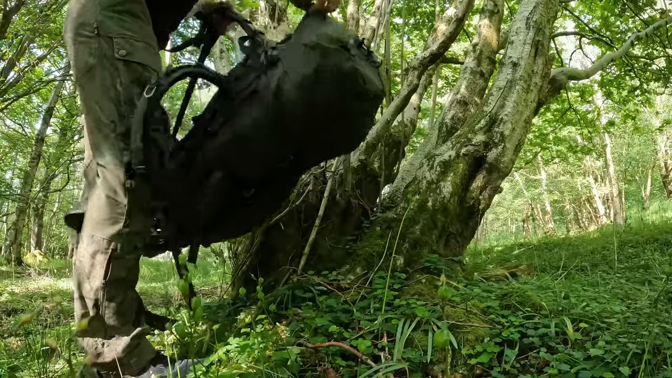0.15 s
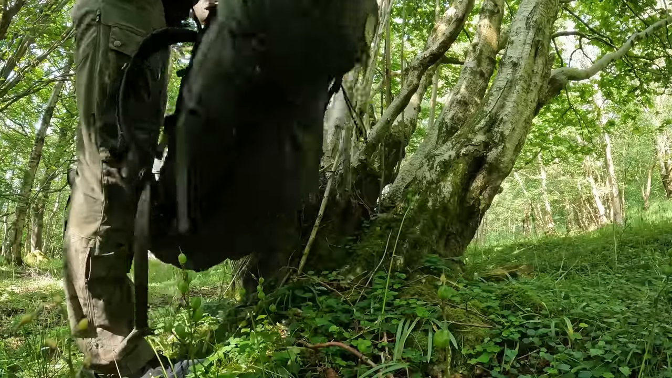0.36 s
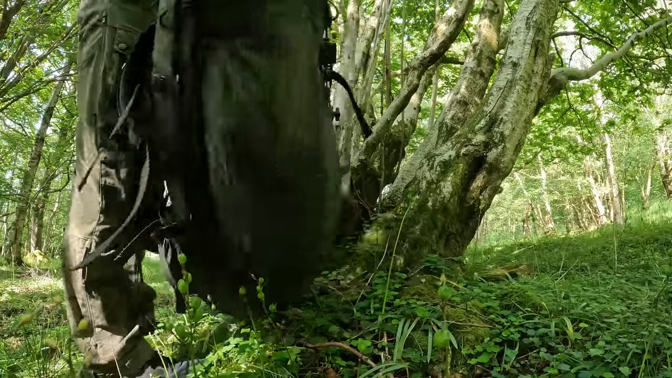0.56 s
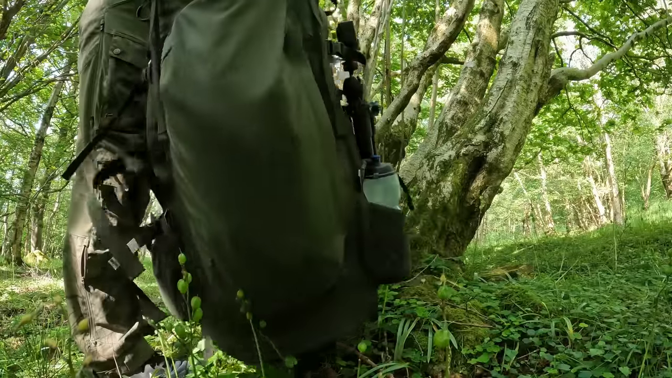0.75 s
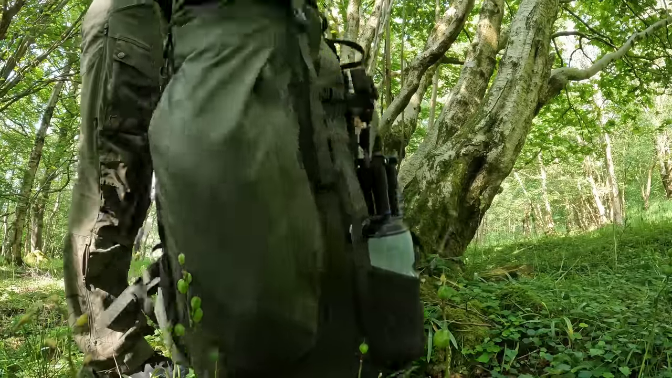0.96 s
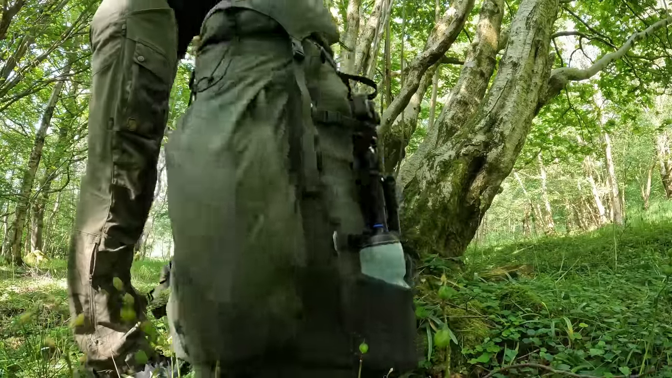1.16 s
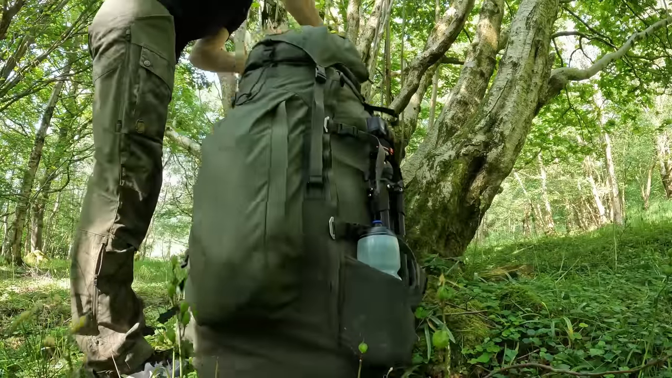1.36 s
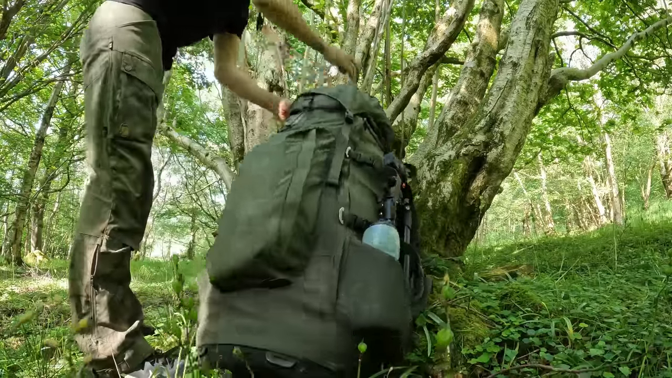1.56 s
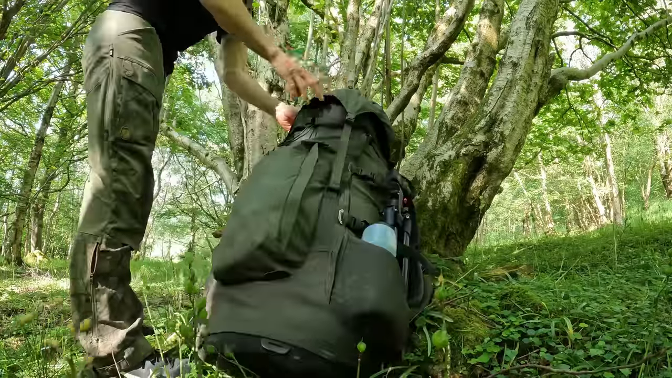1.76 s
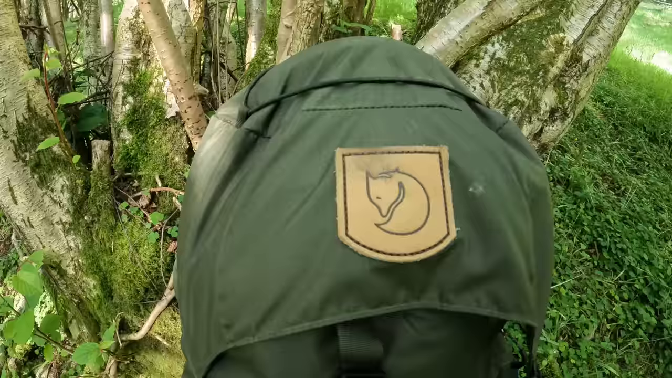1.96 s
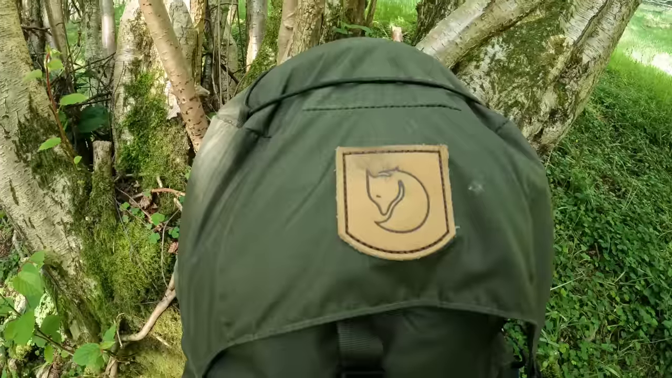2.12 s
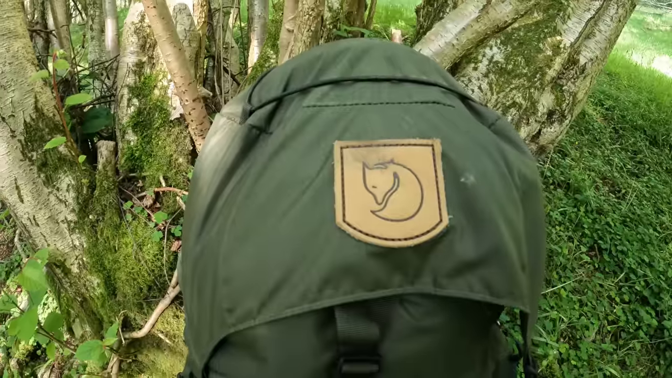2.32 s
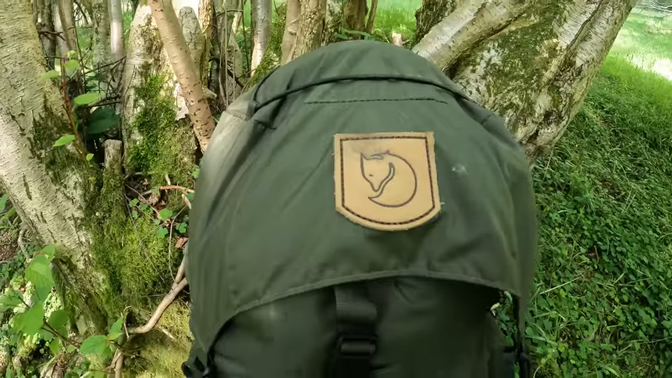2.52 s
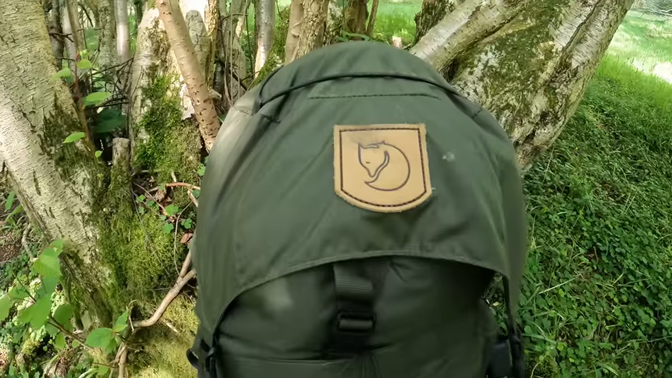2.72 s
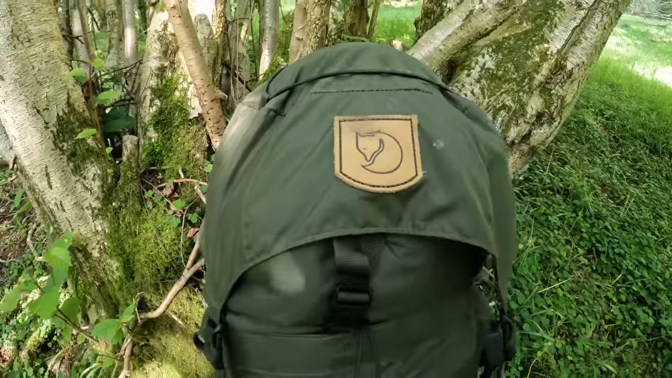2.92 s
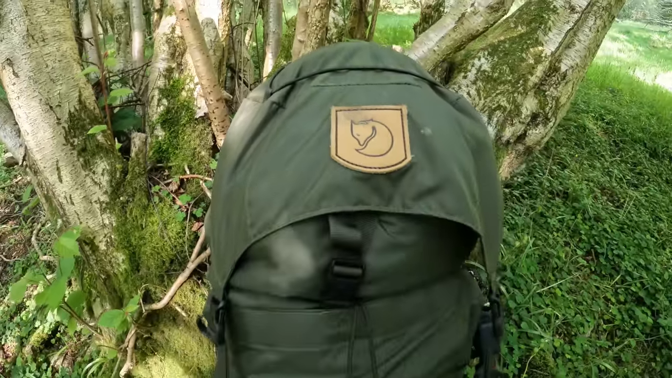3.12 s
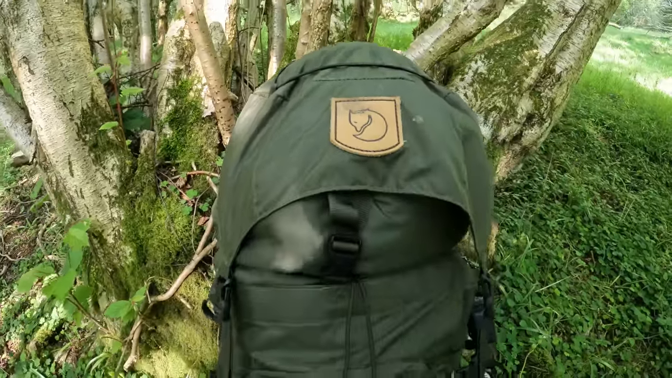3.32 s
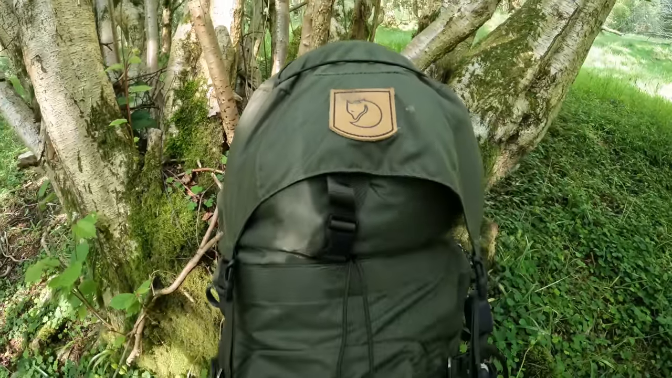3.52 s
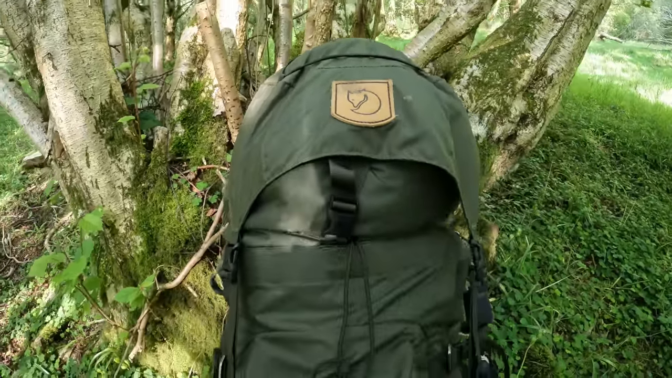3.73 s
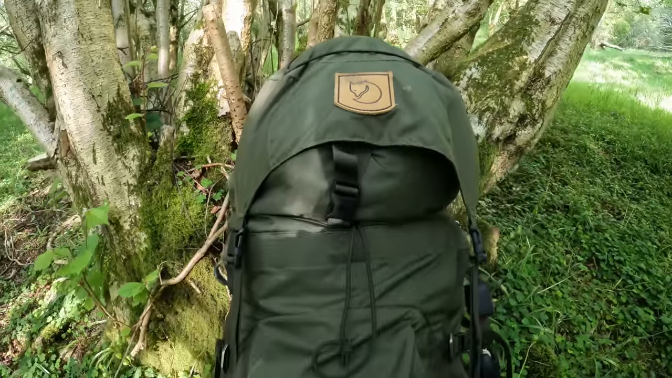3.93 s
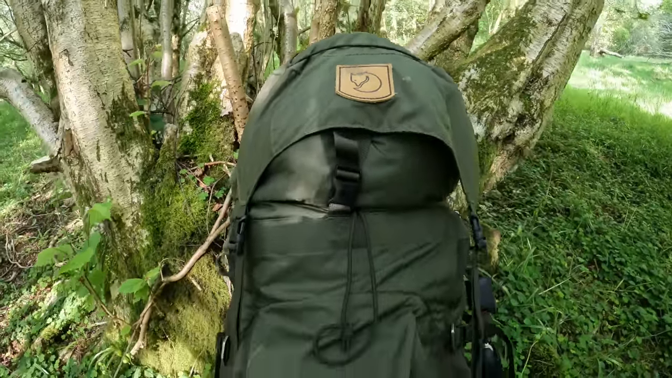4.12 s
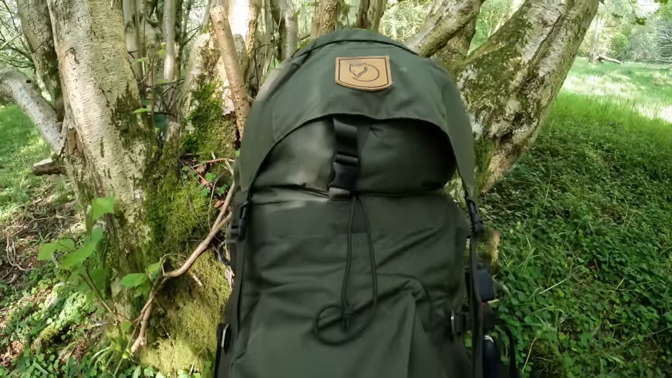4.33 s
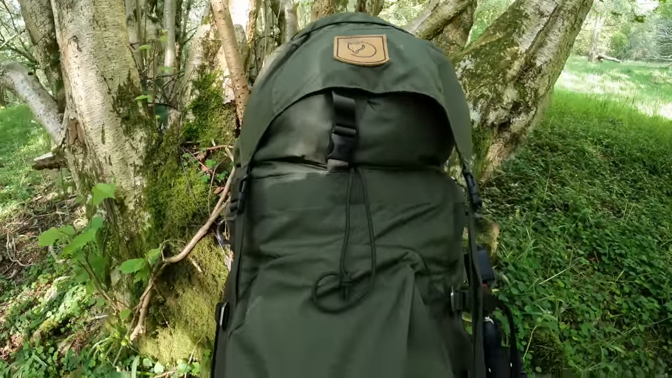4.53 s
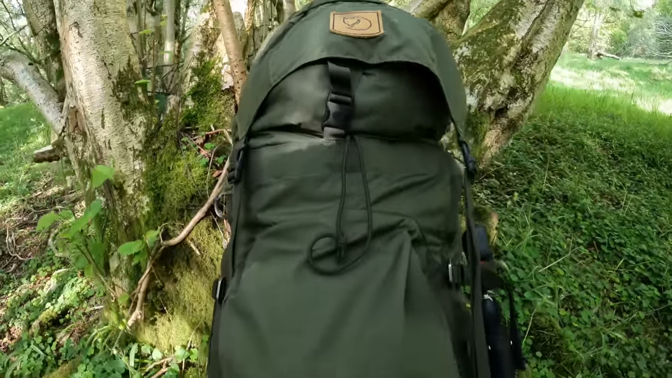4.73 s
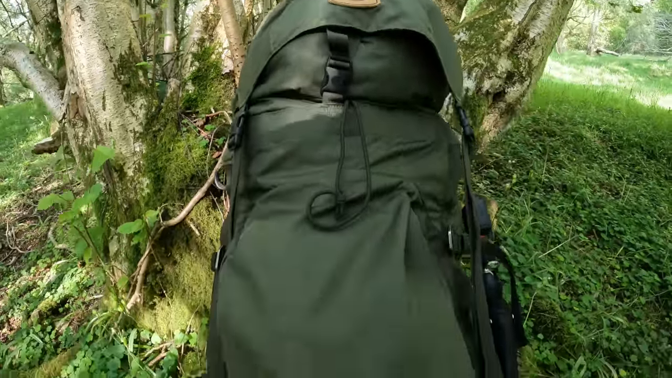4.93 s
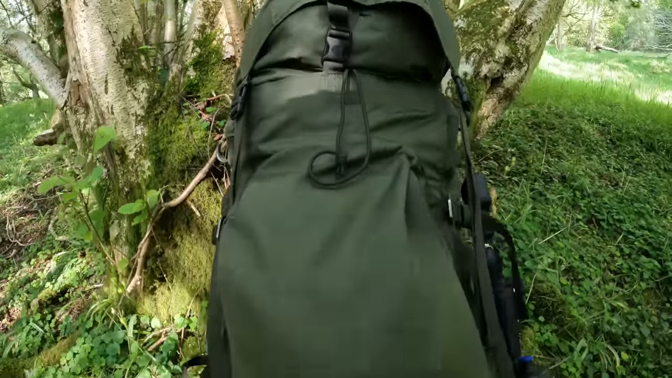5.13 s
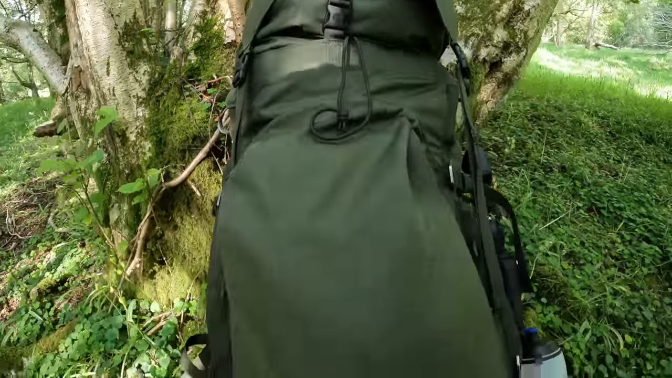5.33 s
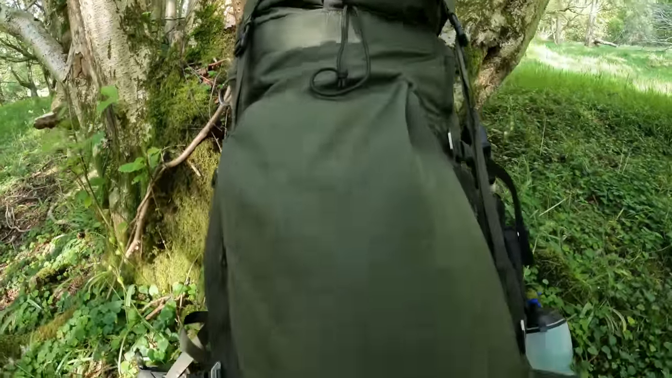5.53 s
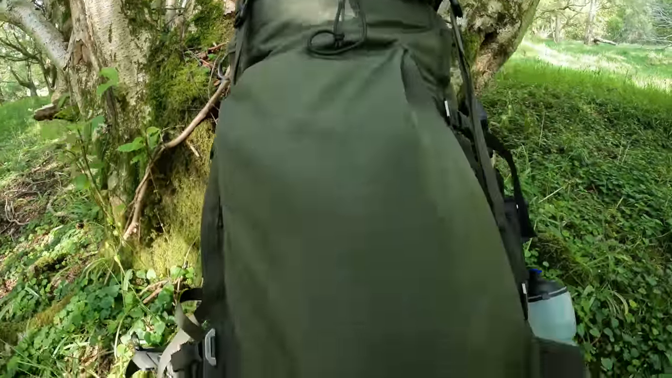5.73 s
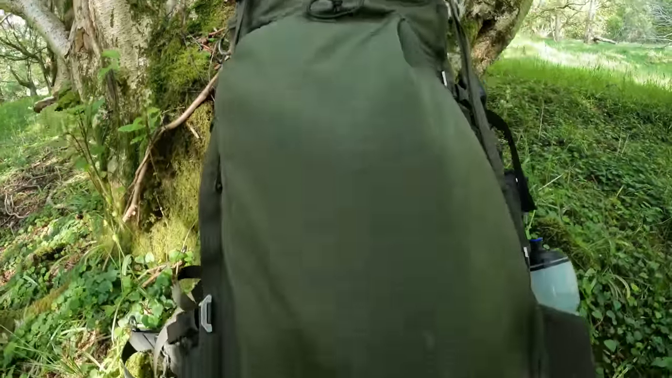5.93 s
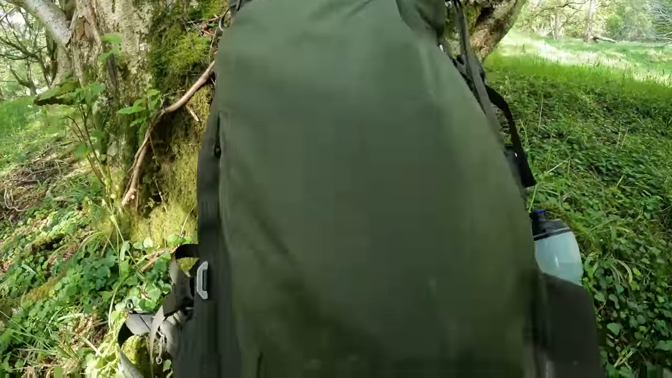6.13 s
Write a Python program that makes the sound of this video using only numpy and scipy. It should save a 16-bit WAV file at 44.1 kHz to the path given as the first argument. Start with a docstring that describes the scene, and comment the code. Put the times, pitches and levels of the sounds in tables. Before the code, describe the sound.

Cloth rustle, snapping twigs and a loud hard knock as a pack lands, cutting abruptly to hushed woods, far birds and plastic grip clicks.

```python
"""A heavy rucksack swings and drops into undergrowth: straps rub, cloth and leaves rustle as filtered grains
of noise, twigs snap as resonant bursts, the load thuds as decaying sines and a buckle clacks on a bottle.
After a hard cut at about 2 s a hand-held camera's grip ticks and creaks as struck modes, its body rumbles
and hums, and far birds sing as echoed gliding tones. The hush of the wood, shaped noise, lies under it all."""
import sys
import numpy as np
from scipy import signal
from scipy.fft import rfft, irfft, next_fast_len
from scipy.io import wavfile
from scipy.ndimage import uniform_filter1d

SR = 44100
rng = np.random.default_rng(int(sys.argv[2]) if len(sys.argv) > 2 else 0)


def wrap_up_sound(samples):
    """Save the sound to the file named by the first command line argument, as 16-bit audio."""
    columns = np.atleast_2d(samples).T
    # keep every value between -1 and 1, then stretch to whole-number steps
    tamed = np.clip(columns, -1, 1)
    steps = np.round(tamed * 32767).astype(np.int16)
    wavfile.write(sys.argv[1], SR, steps)


N = 276507
CUT_S = 1.993  # the close scene of the pack ends here


def amp(db):
    """Decibel law: level to amplitude ratio."""
    return 10 ** (np.asarray(db) / 20)


def evened(x):
    """Power normalisation: scales a signal to rms 1."""
    return x / np.sqrt(np.mean(x ** 2) + 1e-20)


def smooth_noise(count, size):
    """Moving average: slow random fluctuation of rms 1."""
    return evened(uniform_filter1d(rng.standard_normal(count), size))


def coloured(x, points):
    """Spectral shaping: filters by a curve drawn on a log-frequency axis; rms 1."""
    size = next_fast_len(len(x))
    hz, db = np.transpose(points)
    bins_hz = np.fft.rfftfreq(size, 1 / SR)
    gain = amp(np.interp(np.log(bins_hz + 1), np.log(hz), db, left=-80, right=-80))
    return evened(irfft(rfft(x, size) * gain, size)[:len(x)])


def columns(rows):
    """Linear interpolation: joins curve rows by straight lines, one value a sample."""
    s, *values = np.transpose(rows)
    return [np.interp(np.arange(N) / SR, s, v) for v in values]


def add(mix, s, sound):
    """Superposition: adds a sound to the mix from time s, cut at the end."""
    part = mix[round(s * SR):][:len(sound)]
    part += sound[:len(part)]


def ring(hz, t60, size=3000):
    """Damped oscillation: a sine that dies by 60 dB in t60 seconds, 2 ms at least."""
    t = np.arange(size) / SR
    return amp(-60 * t / max(t60, .002)) * np.sin(2 * np.pi * hz * t)


def band(x, hz, sharpness):
    """Resonance: a two-pole peak whose sharpness is its frequency over its width."""
    return signal.lfilter(*signal.iirpeak(hz, sharpness, SR), x)


def grains(per_s, spread_db, t60):
    """Shot noise: the level jumps with each small contact and dies away; a few contacts are large."""
    sizes = amp(spread_db * np.minimum(rng.exponential(1, N), 4))
    jumps = sizes * (rng.random(N) < per_s / SR)
    level = signal.lfilter([1], [1, -amp(-60 / (t60 * SR))], jumps)
    return level * rng.standard_normal(N)


def patchy(x, depth_db, size):
    """Random modulation: patches of time and frequency swell and fade; rms about 1."""
    z = signal.stft(x, nperseg=256)[2]
    over_hz = uniform_filter1d(rng.standard_normal(z.shape), size, 0)
    patches = evened(uniform_filter1d(over_hz, size, 1))
    return evened(signal.istft(z * amp(depth_db * patches), nperseg=256)[1][:N])


def arch(start, length, first_hz, last_hz, db, edge_db):
    """Linear glide: pitch curve rows, with the level shifted by edge_db at both ends."""
    return [(start, first_hz, db + edge_db),
            (start + length / 2, (first_hz + last_hz) / 2, db),
            (start + length, last_hz, db + edge_db)]


def glide(rows, blur):
    """Frequency modulation: a tone along a curve, its pitch shaken by the share blur."""
    s, hz, db = np.transpose(rows)
    t = np.arange(s[0], s[-1], 1 / SR)
    shaken_hz = np.interp(t, s, hz) * (1 + blur * smooth_noise(len(t), 60))
    tone = np.sin(2 * np.pi * np.cumsum(shaken_hz) / SR)
    level = np.sqrt(2) * amp(np.interp(t, s, db))  # the dB of a curve are rms
    return s[0], level * tone * signal.windows.tukey(len(t), .3)


def strike(modes, bright_db, noise, scatter_db):
    """Modal excitation: a brief contact rings an object to peak 1, and small parts rattle with it."""
    body = np.zeros(len(noise))
    for k, (hz, db, t60) in enumerate(modes):
        mode_db = db + bright_db * np.log2(hz / 3000)  # tilt in dB per octave
        body += (-1) ** k * amp(mode_db) * ring(hz, t60, size=len(noise))
    contact = .16 * noise[:70] * np.hanning(70)
    contact[20] += 1.5  # one sharp slip among the small ones
    sound = np.convolve(contact, body)[:len(noise)]
    t = np.arange(len(noise)) / SR
    rattle = band(noise[::-1], 3500 * amp(bright_db / 2), 0.45)
    rattle *= np.minimum(t / 0.00081, 1) * amp(scatter_db - 60 * t / 0.018)
    return sound / abs(sound).max() + rattle


# spectrum of the hush: (frequency [Hz], relative density [dB per Hz])
HUSH_SPECTRUM = [(22, -15.5), (40, -8), (62, 2), (100, 0.5), (165, 2.5), (260, -2.5), (400, -8.5),
                 (600, -11), (900, -6.5), (1200, -9.5), (1700, -18.5), (3500, -17), (6500, -20),
                 (10000, -26), (16500, -34)]
HUSH_DB = -53.5  # rms


def hush():
    """Broadband ambient noise: far leaves, a distant road and the microphone's own hiss."""
    return amp(HUSH_DB) * patchy(coloured(rng.standard_normal(N), HUSH_SPECTRUM), 0.86, size=12)


# bird notes: (start [s], length [s], first pitch [Hz], last pitch [Hz], starting level [dB])
BIRD_NOTES = [(2.12, .04, 3500, 3000, -67), (2.13, .09, 7030, 6390, -65), (2.294, 0.079, 6800, 5900, -64.5),
              (2.239, .03, 3700, 4000, -67), (2.265, .03, 3976, 3600, -64), (2.388, .035, 3600, 3950, -65),
              (2.421, 0.054, 3970, 3210, -62), (2.57, 0.052, 3300, 3050, -60),
              (2.98, 0.12, 7640, 7200, -58.5), (2.974, .13, 6230, 5780, -56), (3.12, .28, 7460, 6820, -62),
              (3.17, .1, 5900, 5150, -57), (3.44, .02, 4650, 4600, -65), (4.703, .08, 7160, 7030, -65),
              (4.77, .03, 3900, 4700, -65), (4.86, 0.105, 7250, 6700, -66), (4.892, .08, 8700, 7800, -67),
              (4.927, 0.093, 4500, 4546, -63), (5.07, .03, 6300, 5500, -58.5), (5.17, .04, 6400, 5620, -57),
              (5.259, 0.066, 6140, 5397, -58.5), (5.28, 0.2, 4483, 4490, -62.5),
              (5.28, .05, 3410, 3000, -65.5), (5.41, .05, 5500, 4760, -64), (6.117, .12, 6170, 5412, -55.5),
              (6.117, .15, 7550, 7200, -57), (6.127, 0.13, 8500, 8050, -58)]
NOTE_FADE_DB_PER_S = -70
# one bird's steep falling chirp: (time from its start [s], pitch [Hz], mean level [dB])
FALLING_CHIRP = [(0, 5300, -76), (.022, 4340, -68), (.05, 3700, -71)]
CHIRP_START_S, CHIRP_EVERY_S = 5.515, .14
# blurred chatter: (start [s], length [s], first pitch [Hz], last pitch [Hz], mid level [dB])
FAR_CHATTER = [(2.45, .9, 3100, 3050, -72.5), (3.35, .7, 3250, 3400, -67.5), (3.3, .35, 5300, 5500, -70.5)]
WARBLE, SYLLABLE_S = .05, .04  # pitch wander as a share, drawn once a syllable


def birds():
    """Reverberation: fluttering near-sine notes are smeared by echoes among the trunks."""
    direct, chatter = np.zeros((2, N))
    for s, length, first_hz, last_hz, db in BIRD_NOTES:
        last_db = db + NOTE_FADE_DB_PER_S * length
        add(direct, *glide([(s, first_hz, db), (s + length, last_hz, last_db)], blur=.009))
    for s in np.arange(CHIRP_START_S, N / SR, CHIRP_EVERY_S):
        level_shift_db = 1.5 * rng.standard_normal()
        add(direct, *glide(np.add(FALLING_CHIRP, [s, 0, level_shift_db]), blur=.02))
    for row in FAR_CHATTER:
        s, hz, db = np.transpose(arch(*row, edge_db=-4.5))
        t = np.arange(s[0], s[-1], SYLLABLE_S)
        wandering_hz = np.interp(t, s, hz) * (1 + WARBLE * rng.standard_normal(len(t)))
        add(chatter, *glide(np.transpose([t, wandering_hz, np.interp(t, s, db)]), blur=0.0252))
    direct += chatter * amp(3.5 * smooth_noise(N, 1200))  # the level flickers like short syllables
    t = np.arange(SR // 2) / SR
    tail = rng.standard_normal(len(t)) * amp(-60 * t / 0.646)
    return direct + amp(-2.5) * signal.oaconvolve(direct, tail / np.linalg.norm(tail))[:N]


# two squeezes of the hand on the camera: (time [s], rumble level [dB], body hum level [dB])
HAND_SQUEEZES = [
    [(2.4, -68.5, -59.5), (2.9, -61.5, -58.5), (3.4, -67, -59), (3.62, -57, -53), (3.82, -53, -52),
     (3.95, -56, -53.5), (4.15, -50, -50), (4.31, -44, -44), (4.38, -44.5, -49.5), (4.45, -60, -47.5),
     (4.5, -55, -59), (4.58, -60, -71)],
    [(6, -55.5, -58), (6.02, -42, -40.5), (6.05, -47.5, -55), (6.2, -83, -75)],
]
# spectrum of the rumble: (frequency [Hz], relative density [dB per Hz])
RUMBLE_SPECTRUM = [(25, -23), (45, -15), (65, 9.5), (110, -3.5), (170, -22)]
# spectrum of the body hum: (frequency [Hz], relative density [dB per Hz])
HUM_SPECTRUM = [(90, -34), (150, -2.5), (250, -1), (350, -5), (550, -15.5), (900, -35)]


def hand():
    """Structure-borne sound: lumpy low noise from the hand, through the camera body."""
    rumble_db, hum_db = columns(sum(HAND_SQUEEZES, []))
    rumble = coloured(rng.standard_normal(N), RUMBLE_SPECTRUM)
    hum = coloured(grains(250, 3.0, 0.078), HUM_SPECTRUM)
    t = np.arange(N) / SR
    holding = np.zeros(N)
    for rows in HAND_SQUEEZES:
        to_nearer_end_s = np.minimum(t - rows[0][0], rows[-1][0] - t)
        holding += np.clip(to_nearer_end_s * 30, 0, 1)
    return (amp(rumble_db) * rumble + amp(hum_db) * hum) * holding


# grip ticks: (time [s], tick level [dB], knock relative to it [dB], brightness [dB per octave])
GRIP_TICKS = [(2.0388, -44, -12, 9.5), (2.3469, -40, -4, -5), (2.59, -43, 0.5, 11),
              (2.6497, -39, -11.5, -8), (2.678, -39.5, -6, -2), (2.739, -42, -7, -1),
              (2.772, -28, -6.5, -4.5), (2.8438, -32.5, -6.5, -6), (3.1432, -34.5, -7, -3.5),
              (3.2, -32.5, -2.5, -2), (3.2447, -34, -3, -4), (3.2916, -35, -2.5, -3),
              (3.3303, -36.5, -2, -7), (3.3857, -37.5, 0.5, -3), (3.5191, -40.5, -4, -4),
              (3.5598, -41, -3, -9.5), (3.594, -35, -1, -2), (3.634, -38, -10, -4), (3.666, -38.5, -7, 1),
              (3.7487, -39.5, -14, 2), (3.8147, -44.5, 10.5, -2), (4.308, -39, -1, -4),
              (4.4154, -40, -11, -2), (4.6, -36, -20, 18), (4.808, -49, 8.5, 2), (4.98, -50, 7.5, 0),
              (5.1807, -46, 7, 0), (5.671, -41.5, -15.5, 8), (5.9616, -41, -20, 17),
              (6.0137, -18, -14, 0.5), (6.0775, -41, -10, 9), (6.0975, -40.5, -18, 10)]
# modes of the plastic grip: (frequency [Hz], relative level [dB], decay by 60 dB [s])
GRIP_MODES = [(1390, -5, 0.0058), (3060, 1, 0.01), (3900, 1.5, 0.0027), (5450, -2, 0.0076),
              (7100, -1.5, 0.0064), (8600, -11.5, .005), (11300, -30, 0.00248)]
# knock of the camera body: (frequency [Hz], decay by 60 dB [s], delay after the tick [s])
BODY_KNOCK = (260, 0.045, 0.00454)
# faint ticks scattered between: (mean rate [per s], level [dB], brightness [dB per octave])
FAINT_GRIP_TICKS = (2.5, -42, 8)


def grip_ticks():
    """Impact excitation: single ticks ring the plastic grip; the camera body knocks just after."""
    out = np.zeros(N)
    hz, knock_t60, delay = BODY_KNOCK
    for s, db, knock_db, bright_db in GRIP_TICKS:
        noise = rng.standard_normal(900)
        add(out, s, amp(db) * strike(GRIP_MODES, bright_db, noise, scatter_db=-14.0))
        add(out, s + delay, amp(db + knock_db) * ring(hz * (1 + 0.043 * noise[0]), knock_t60))
    per_s, db, bright_db = FAINT_GRIP_TICKS
    chosen = rng.random(N - round(CUT_S * SR)) < per_s / SR
    for s in CUT_S + np.flatnonzero(chosen) / SR:
        tick = strike(GRIP_MODES, bright_db, rng.standard_normal(900), scatter_db=-14.5)
        add(out, s, amp(db) * tick)
    return out


# quick slips of the grip: (time [s], reference level [dB], slip rate [per s])
GRIP_CREAK = [(3.35, -63.5, 30), (4.1, -67.5, 62), (4.24, -61.5, 79), (4.27, -57.5, 80), (4.37, -58, 81),
              (4.39, -58, 420), (4.445, -59, 400), (4.47, -64, 93)]


def creak():
    """Stick-slip friction: a run of quick slips rings the grip while skin slides between them."""
    out = np.zeros(N)
    creak_db, per_s = columns(GRIP_CREAK)
    unsteady = abs(1 + .15 * smooth_noise(N, 500))
    at_sample = np.arange(N)
    active = (at_sample > GRIP_CREAK[0][0] * SR) & (at_sample < GRIP_CREAK[-1][0] * SR)
    slip_count = np.floor(np.cumsum(per_s * unsteady) / SR)
    for at in np.flatnonzero(np.diff(slip_count, prepend=0) * active):
        noise = rng.standard_normal(900)
        slip_db = creak_db[at] + 16 + 2.5 * noise[0]
        add(out, at / SR, amp(slip_db) * strike(GRIP_MODES, -1.5, noise, scatter_db=-12))
    response = sum(amp(db) * ring(hz, t60 / 2) for hz, db, t60 in GRIP_MODES[1:5])
    rasp = signal.oaconvolve(rng.standard_normal(N), response)[:N]
    return out + amp(creak_db - 4) * active * evened(rasp)


# short rubs of strap on cloth: (start [s], length [s], first pitch [Hz], last pitch [Hz],
# mid level [dB], unsteadiness [share of pitch])
STRAP_RUBS = [(0.065, .02, 1503, 1508, -31.5, .2), (.092, 0.013, 1400, 1430, -22, 0.18),
              (0.713, 0.0291, 3300, 4600, -34.5, .05), (.842, 0.057, 601, 481, -31.5, 0.17),
              (0.883, 0.034, 330, 293, -30.5, 0.14), (0.913, 0.029, 592, 1287, -31.5, .15)]
RUB_EDGE_DB = -10  # ends of a rub under its middle


def rubs():
    """Stick-slip friction: webbing gives a rough, wandering tone."""
    out = np.zeros(N)
    for *row, blur in STRAP_RUBS:
        add(out, *glide(arch(*row, RUB_EDGE_DB), blur))
    return out * (1 + 0.42 * smooth_noise(N, 50))


# twigs and buckles: (time [s], peak level before the treble is softened [dB], centre [Hz])
TWIG_SNAPS = [(0.189, -23.5, 1890), (0.195, -26.5, 6000), (0.237, -28, 6380), (0.4183, -20.5, 3470),
              (0.4964, -21, 1980), (0.5435, -18, 4510), (0.713, -19.5, 3720), (0.745, -29, 5440),
              (0.785, -20.5, 6900), (0.812, -24, 7000), (0.847, -21.5, 2260), (0.953, -4.5, 6350),
              (0.96, -10, 6700), (0.993, -13, 850), (1.007, -18.5, 2120), (1.145, -28.5, 964),
              (0.954, -17, 900), (1.2045, -12.5, 5000), (1.252, -26, 826), (1.274, -20.5, 6150),
              (1.331, -18.5, 1490), (1.333, -14.5, 6950), (1.352, -17.5, 1130), (1.424, -23, 885),
              (1.442, -17.5, 5700), (1.522, -19, 8350), (1.557, -26, 1997), (1.563, -19, 5470),
              (1.567, -19.5, 7000), (1.622, -25, 1470), (1.967, -17.5, 9820), (1.982, -19, 5500)]
SNAP_T60, SNAP_SHARPNESS = 0.016, 2.25  # tail [s], ring as frequency over width


def snaps():
    """Impulsive release: a sudden crack with a short noisy tail, coloured by the piece that broke or struck."""
    out, t = np.zeros(N), np.arange(3000) / SR
    decay = amp(-60 * t / 0.0031) + 0.16 * amp(-60 * t / SNAP_T60)
    for s, db, hz in TWIG_SNAPS:
        burst = rng.standard_normal(3000) * np.minimum(t / 0.00051, 1) * decay
        piece = band(band(burst, hz, SNAP_SHARPNESS), hz, .5)
        sound = piece + .12 * band(burst, 3600, 0.3)
        add(out, s, amp(db) * sound / abs(sound).max())
    return signal.lfilter(*signal.butter(2, 11500, fs=SR), out)


# soft blows of the load: (time [s], level before decay [dB], frequency [Hz], decay by 60 dB [s])
LOAD_THUDS = [(0.497, -28, 384, 0.0345), (0.829, -26.5, 770, 0.024), (0.987, -20, 384, 0.094),
              (1.006, -17.5, 247, 0.037), (1.203, -29, 410.6, 0.048), (1.329, -33.5, 510, .037),
              (1.517, -24, 120.6, .036), (1.561, -21, 480, .04), (1.564, -18, 193, 0.085),
              (1.622, -23, 182, .07)]
THUD_RISE_S = .003


def thuds():
    """Damped oscillation: each soft blow of the load is a low sine that rises gently and dies."""
    out, t = np.zeros(N), np.arange(6000) / SR
    for s, db, hz, t60 in LOAD_THUDS:
        add(out, s, amp(db) * ring(hz, t60, size=6000) * np.minimum(t / THUD_RISE_S, 1))
    return out


# a hard buckle strikes the bottle: (time [s], level [dB])
BUCKLE_CLACK = (1.5114, 1.1)
# modes of that blow: (frequency [Hz], relative level [dB], decay by 60 dB [s])
BUCKLE_MODES = [(750, -2, 0.013), (1480, -10, .005), (2500, -5.5, 0.0044), (4080, -8.5, 0.0051),
                (6100, -5.5, 0.005), (8400, -2.5, 0.0076), (9100, -3, .006), (10100, 1.5, 0.01)]


def clack():
    """Modal impact: the loudest knock, as the pack tips over."""
    out = np.zeros(N)
    s, db = BUCKLE_CLACK
    add(out, s, amp(db) * strike(BUCKLE_MODES, 0, rng.standard_normal(900), scatter_db=-7))
    return out


# spectrum of the leaves: (frequency [Hz], relative density [dB per Hz])
LEAF_SPECTRUM = [(1180, -7.5), (2000, -7.5), (3170, -5), (4150, -6.5), (5070, -5), (5390, -2), (7000, -4.5),
                 (14800, -19.5), (16000, -31.5)]
# spectrum of the cloth: (frequency [Hz], relative density [dB per Hz])
CLOTH_SPECTRUM = [(300, -25.5), (700, -2.5), (1200, -3.5), (2000, -5), (3200, -8.5), (5000, -7.5)]
# spectrum of the load: (frequency [Hz], relative density [dB per Hz])
LOAD_SPECTRUM = [(45, -35), (80, -10), (130, -1), (250, -0.5), (450, -2), (800, -5.5), (1500, -17)]
# swishes of pack and boots through the plants: (peak time [s], time to die by 10 dB [s],
# leaves level [dB], cloth level [dB], load level [dB]); a negative time swaps rise and fall
PLANT_SWISHES = [(.02, 0.2, -41, -45.5, -44), (.075, .03, -38.5, -37, -46), (.125, 0.04, -41.5, -37.5, -40),
                 (.18, .02, -45, -41, -47), (.23, 0.11, -43.5, -47.5, -54),
                 (.31, 0.16, -43.5, -43.5, -51.5), (.41, .06, -44.5, -50, -53.5),
                 (.497, -0.03, -40, -36, -48), (.538, 0.03, -32, -59, -49.5), (.62, .06, -43, -47.5, -44),
                 (.68, 0.0343, -36.5, -39, -50), (.725, .02, -41, -43, -57),
                 (.797, 0.04, -40.5, -39.5, -46.5), (.815, 0.05, -47, -43.5, -46),
                 (.86, 0.04, -37.5, -38, -46), (.905, 0.0744, -35.5, -40.5, -41),
                 (.95, 0.0551, -30, -35.5, -50), (1.0, 0.04, -23, -30.5, -22.5),
                 (1.1, 0.08, -36, -40.5, -36), (1.2, 0.1, -40, -44.5, -46), (1.32, .07, -37.5, -41, -42),
                 (1.445, 0.06, -36, -43, -38.5), (1.515, .03, -38, -45, -37), (1.574, .013, -37, -35, -30),
                 (1.595, .025, -37, -33, -34), (1.625, 0.07, -31.5, -35.5, -32),
                 (1.8, 0.12, -43, -49.5, -47), (1.9, .05, -47, -47.5, -50.5),
                 (1.969, 0.05, -35, -43, -48.5)]
RISE_SHARE = 0.79  # a swish rises in this share of the time it takes to die


def pack():
    """Friction noise: leaves fizz, cloth scrapes and the load grumbles; each swish swells and dies in all three."""
    peak, fall, *levels_db = np.transpose(PLANT_SWISHES)[:, :, None]
    t = np.arange(round(CUT_S * SR)) / SR
    shape_db = -10 * np.maximum((t - peak) / fall, (peak - t) / (RISE_SHARE * fall))
    leaves = patchy(coloured(grains(1500, 1.17, 0.027), LEAF_SPECTRUM), 1.3, size=8)
    cloth = patchy(coloured(grains(600, 3.9, 0.021), CLOTH_SPECTRUM), 0.73, size=5)
    load = coloured(grains(164, 2.7, 0.081), LOAD_SPECTRUM)
    out = np.zeros(N)
    for layer, db in zip((leaves, cloth, load), levels_db):
        level = np.linalg.norm(amp(db + shape_db), axis=0)  # overlapping swishes add in power
        add(out, 0, level * layer[:len(t)])
    return out * np.clip((CUT_S - np.arange(N) / SR) * 400, 0, 1)


def scene():
    """Superposition: all sources summed into one channel."""
    background = hush() + birds()
    camera = hand() + grip_ticks() + creak()
    rucksack = rubs() + snaps() + thuds() + clack() + pack()
    return (background + camera + rucksack)[None]


OVERLOAD = .72  # peaks are rounded off toward this amplitude
EDGE_HZ = 16000


def record(dry):
    """Saturation: the microphone thins the lowest bass, the input rounds off peaks, then a band limit."""
    thinned = signal.lfilter(*signal.butter(2, 45, "high", fs=SR), dry)
    rounded = thinned / (1 + (thinned / OVERLOAD) ** 4) ** (1 / 4)
    band_limit = signal.firwin(511, EDGE_HZ, window=("kaiser", 9), fs=SR)
    return signal.oaconvolve(rounded, band_limit[None], "same")


dry = scene()
out = record(dry)
wrap_up_sound(out)
```